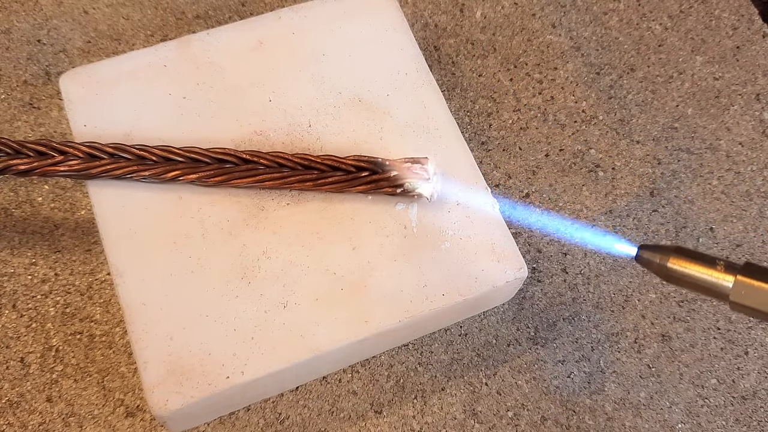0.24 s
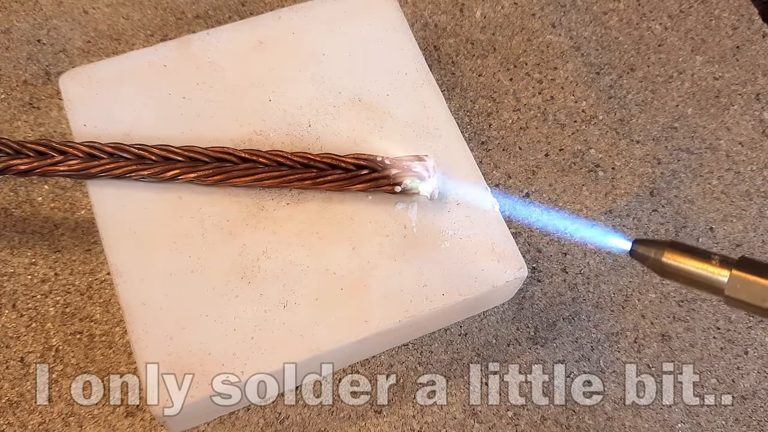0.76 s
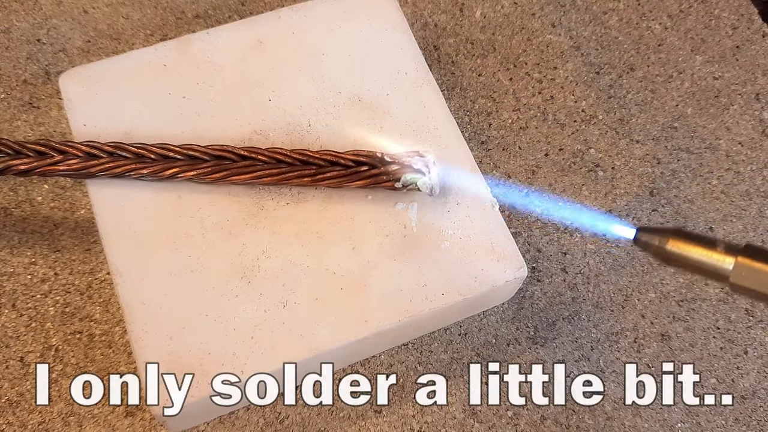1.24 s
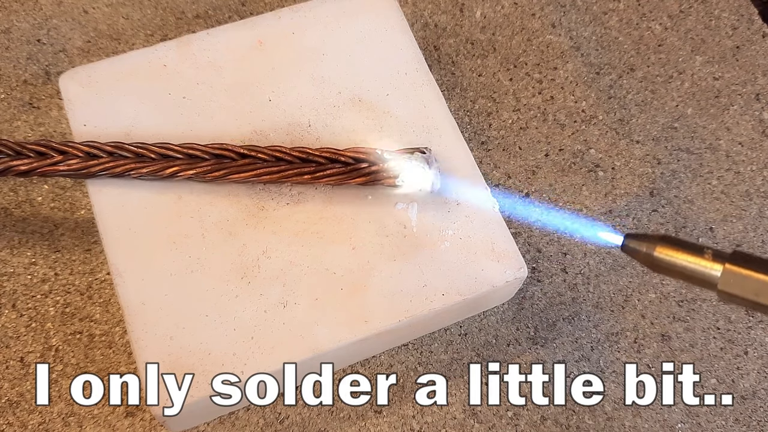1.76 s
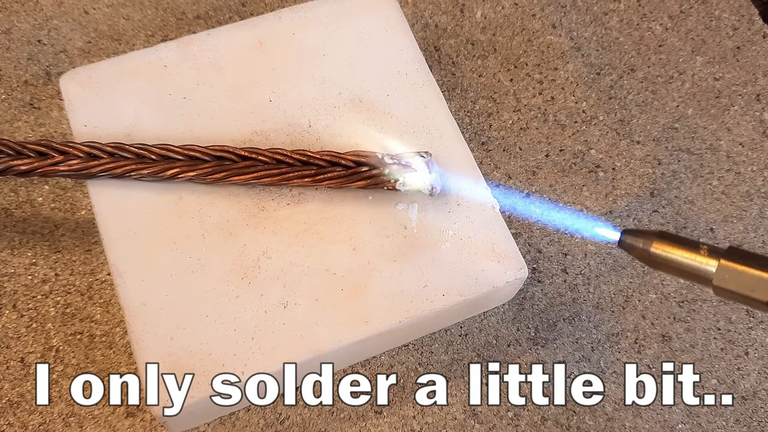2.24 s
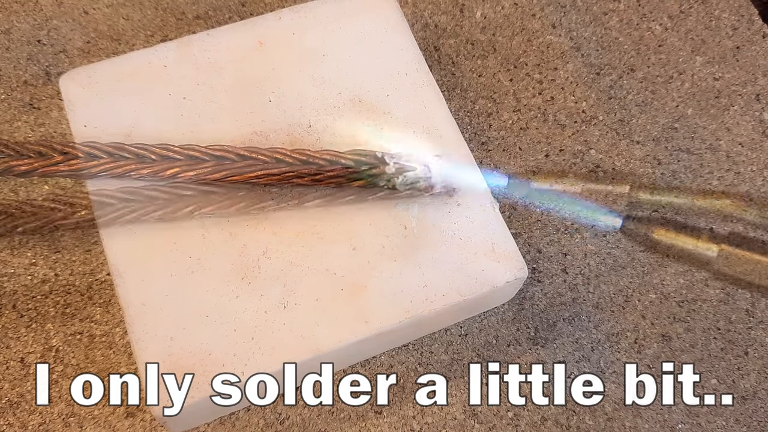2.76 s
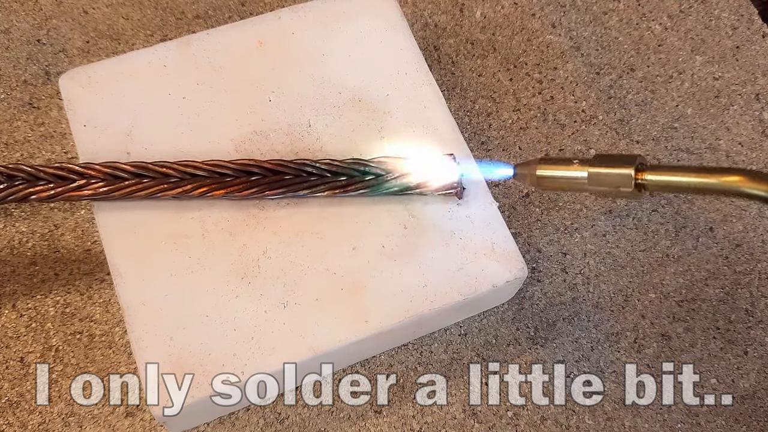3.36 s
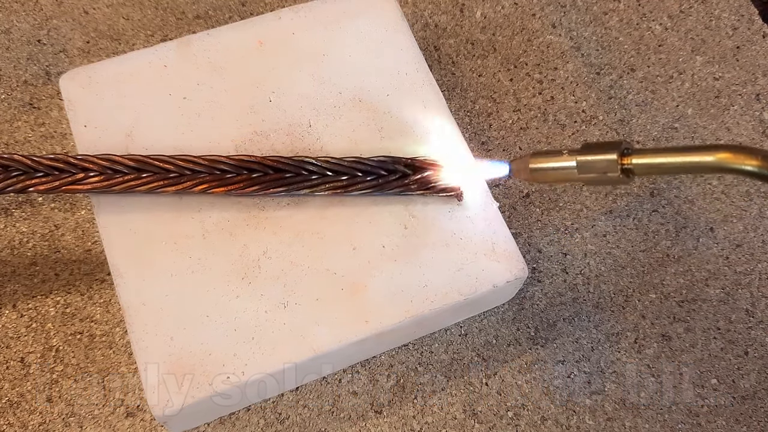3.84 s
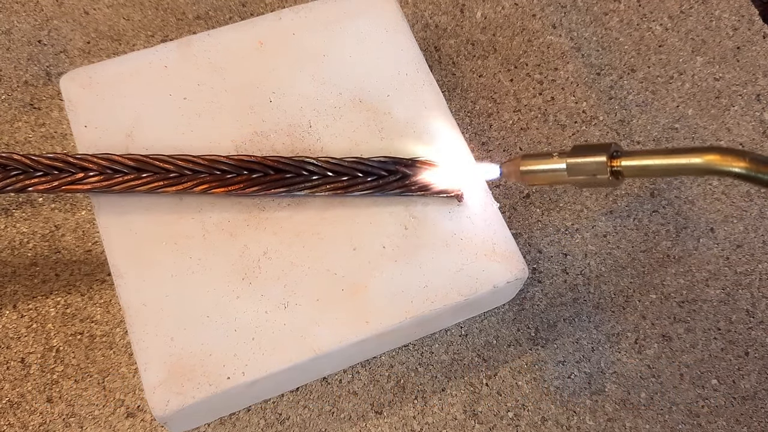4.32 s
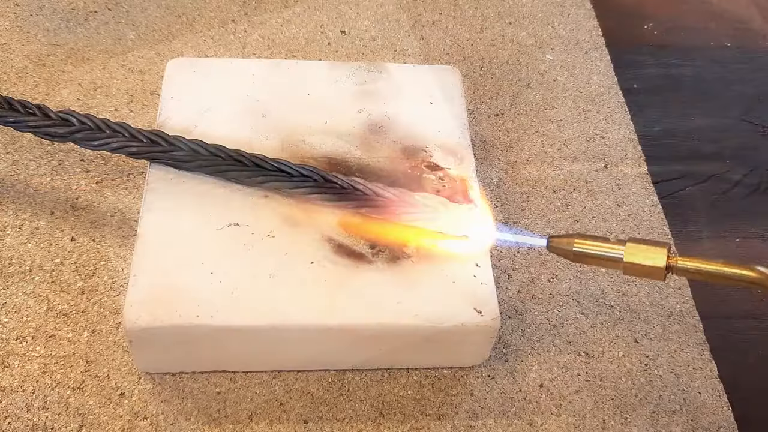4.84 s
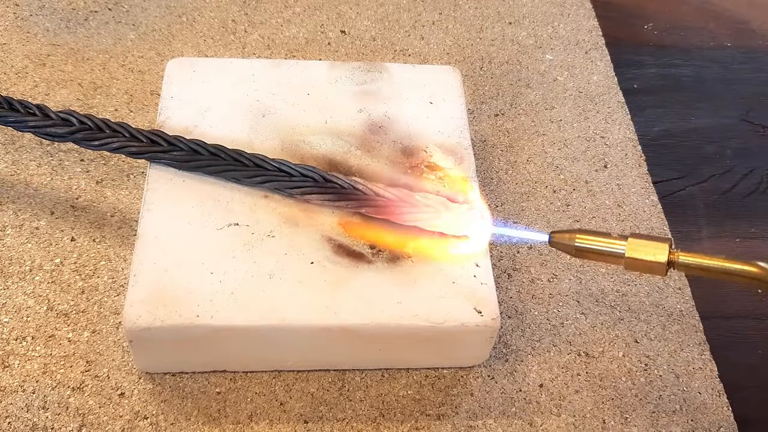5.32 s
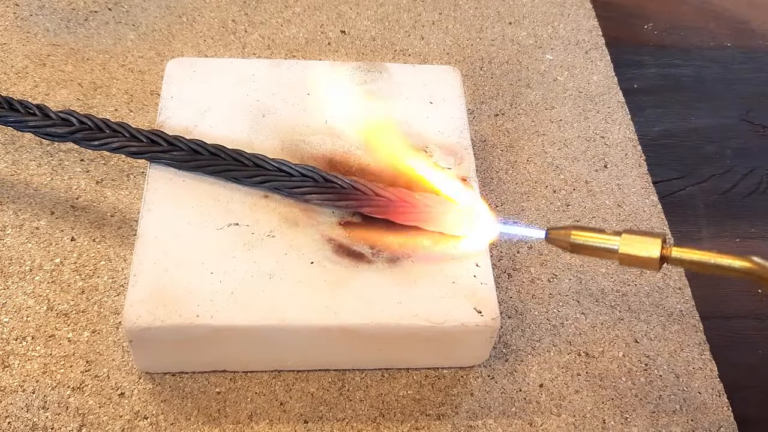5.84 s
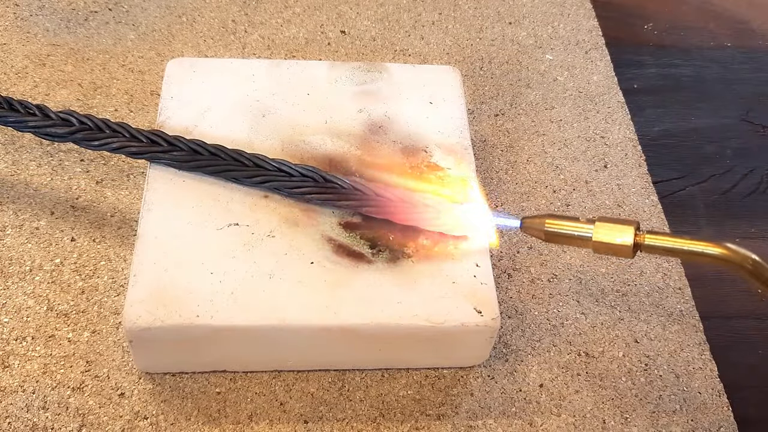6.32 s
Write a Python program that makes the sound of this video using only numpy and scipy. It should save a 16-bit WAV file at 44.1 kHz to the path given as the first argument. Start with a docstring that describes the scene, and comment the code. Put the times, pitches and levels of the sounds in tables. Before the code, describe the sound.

A small gas torch hisses sharply and steadily against copper wire in a quiet workshop, then softens to a fuller, fluttering, much quieter rush.

```python
"""In a quiet workshop, a small gas torch heats a braided copper wire on a firebrick before two microphones.
Three stretches crossfade: flame tip on the wire, nozzle close in, wire glowing with the flame spread.
The turbulent jet roars low, hisses and sizzles high: fluttering noise, coloured anew for each stretch.
Soft knocks on the stand are brief decaying low modes and a dull tick is one pulse.
Behind them lie a noise rumble and, in the last stretch, a hum of wavering sines."""
import sys
import numpy as np
from scipy import signal
from scipy.fft import rfft, irfft, next_fast_len
from scipy.io import wavfile
from scipy.ndimage import uniform_filter1d

SR = 44100
rng = np.random.default_rng(int(sys.argv[2]) if len(sys.argv) > 2 else 0)


def persist_wave(psi):
    """Save psi, clipped to +-1, as 16-bit WAV."""
    counts = np.round(np.clip(psi, -1, 1) * 32767).astype(np.int16)
    wavfile.write(sys.argv[1], SR, np.atleast_2d(counts).T)


N = 290619
T = np.arange(N) / SR
SIZE = next_fast_len(N, True)
HZ = np.maximum(np.arange(SIZE // 2 + 1) * SR / SIZE, 1)  # kept above 0 for the log axis
TOP_HZ = 15740  # upper limit of the sound


def turbulence(eddy_db=1.52, bass_db=4.0, treble_db=1.0):
    """Two noises whose bands flutter: quickly together with the eddies, and each alone, the bass most."""
    white = rfft(rng.standard_normal((2, N)), SIZE)
    together_db = eddy_db * walk(300)
    octave_edges = [above(hz, .08) for hz in 350 * 2. ** np.arange(6)]
    edges = [1.] + octave_edges + [0.]
    alone_db = np.linspace(bass_db, treble_db, len(edges) - 1)
    gas = 0
    for lower, upper, depth_db in zip(edges, edges[1:], alone_db):
        band = irfft(white * (lower - upper), SIZE)[:, :N]
        gas = gas + band * undb(together_db + depth_db * walk(10.8))
    return gas


def flame(gas, levels_db, colour, peaks, pair, roar_hz, sizzle_hz, top_hz):
    """The jet at both microphones; roar, hiss, sizzle and top edge each follow their level."""
    shared, other = rfft(gas, SIZE)

    # the right side is partly the left one delayed in phase, partly a noise of its own
    pair_hz, alike, behind = np.transpose(pair)
    alike = over_hz(pair_hz, alike)
    lag = np.exp(-1j * over_hz(pair_hz, behind))
    right = alike * lag * shared + np.sqrt(1 - alike ** 2) * other

    hz, left_db, right_db = np.transpose(colour)
    sides = np.array([undb(over_hz(hz, left_db)) * shared, undb(over_hz(hz, right_db)) * right])
    sides *= ridges(peaks) * surfaces() * above(138, 1.0) * (HZ < TOP_HZ)

    low = 1 - above(roar_hz, 0.55)
    high, top = above(sizzle_hz, 0.022), above(top_hz, 0.034)
    jet = 0
    for share, db in zip((low, 1 - low - high, high - top, top), levels_db):
        part = irfft(sides * share, SIZE)[:, :N]
        jet = jet + part * undb(db) / np.std(part.mean(axis=0))
    return jet


def band_levels(shift, band_db, follow):
    """Levels of roar, hiss, sizzle and top edge: all follow the shift of the torch, each by its share."""
    # the roar swells or sags as the flame splashes over the strands: (time [s], width [s], level [dB])
    flares = [(.11, 0.021, 4), (.39, 0.017, -5), (.78, 0.086, 3), (1.38, 0.033, 6.5), (1.64, 0.013, 6),
              (1.88, 0.024, 2.5), (2.3, 0.057, 3), (3.08, 0.16, 4), (3.55, 0.03, 5), (3.8, 0.061, 6.5),
              (4.38, 0.034, 6), (4.73, 0.041, 4), (4.85, 0.04, 1)]
    # the hiss drops briefly: (time [s], width [s], level [dB])
    hiss_dips = [(5.83, .03, -2.5), (6.11, 0.03, -2), (6.35, 0.046, -0.5)]
    # the hiss drops as the flame slips off the wire end and returns at once: (time [s], level [dB])
    hiss_gap = [(5.92, -0.5), (5.932, -4), (6.0, -4.5), (6.06, -5), (6.078, 0)]
    # the sizzle swells or dips briefly: (time [s], width [s], level [dB])
    sizzle_swells = [(3.5, 0.17, 3.5), (4.2, 0.0085, -9), (5.89, 0.09, 2.5)]
    flicker_db, flicker_per_s = 2.1, 13  # sizzle and top edge, each alone

    moved_db = np.interp(T, *np.transpose(shift))
    roar, hiss, sizzle, top = (db + share * moved_db for db, share in zip(band_db, (*follow, 1)))
    roar = roar + swells(flares)
    hiss = hiss + swells(hiss_dips) + np.interp(T, *np.transpose(hiss_gap))
    sizzle = sizzle + swells(sizzle_swells) + flicker_db * walk(flicker_per_s)
    top = top + flicker_db * walk(flicker_per_s)
    return roar, hiss, sizzle, top


def surfaces(echo_db=-9, t60=.2, common=.65, from_hz=3500):
    """Direct sound plus scatter off bench and walls, stronger in the treble, partly common to both sides."""
    t = T[:SR // 4]
    both, *each = rng.standard_normal((3, len(t))) * np.exp(-np.log(1000) * t / t60)
    scatter = common * both + (1 - common) * np.array(each)
    scatter /= np.linalg.norm(scatter, axis=1, keepdims=True)
    share = .5 + .4 * above(from_hz, 1.)
    return 1 + undb(echo_db) * share * rfft(scatter, SIZE)


def turned(jet, span, change):
    """As the torch turns, the jet slides from its colour before the turn to its colour after it."""
    spectrum = rfft(jet, SIZE)
    half = np.sqrt(ridges(change))  # half the change lies on each side of the mean colour
    before = irfft(spectrum / half, SIZE)[:, :N]
    after = irfft(spectrum * half, SIZE)[:, :N]
    return before + np.interp(T, span, (0, 1)) * (after - before)


def rushing(sound):
    """The middle band swells and ebbs as the flame plays over the wire."""
    # edges of the middle band: (low edge [Hz], high edge [Hz])
    rush_hz = (1310, 3480)
    # swells and ebbs of the middle band: (time [s], width [s], level [dB])
    rush_swells = [(.97, 0.054, 0), (2.92, .05, -1), (3.12, .06, 1), (3.32, 0.016, -2.5), (3.76, .07, 0),
                   (3.9, .05, -1), (4.13, .04, 1), (4.23, 0.044, -1), (4.926, .007, 5), (5.3, .1, 0.5),
                   (5.52, 0.018, 1), (5.62, 0.023, -1.5), (5.78, 0.036, 1.5), (6.02, 0.08, -3),
                   (6.24, .05, -2), (6.45, .06, 0)]
    # it holds back early in the last crossfade, then catches at once: (time [s], level [dB])
    rush_catch = [(4.64, 0), (4.74, -4), (4.8, -4), (4.813, 3), (4.85, 2.5), (4.9, 0)]

    middle = above(rush_hz[0], 0.34) - above(rush_hz[1], 0.14)
    band = irfft(rfft(sound, SIZE) * middle, SIZE)[:, :N]
    level_db = swells(rush_swells) + np.interp(T, *np.transpose(rush_catch))
    return sound + (undb(level_db) - 1) * band


def bump(at, level_db, pitch):
    """A knock rocks the low modes of the stand under a bell-shaped push, mostly on the right."""
    # modes of the stand, before pitch factor, knock level and pan: (frequency [Hz], peak level [dB])
    bump_modes = [(90, -57.5), (138, -52), (168, -59), (260, -66)]
    rise_s, fall_s, pan_db = .021, .014, -24  # pan is left against right
    briefer = 1.5  # modes above the second one shorter: power of their frequency ratio to it

    since = T - at
    scaled = since / np.where(since < 0, rise_s, fall_s)
    rock = 0
    for hz, db in bump_modes:
        push = np.exp(-(scaled * max(hz / bump_modes[1][0], 1) ** briefer) ** 2 / 2)
        rock = rock + undb(db + level_db) * push * np.cos(2 * np.pi * pitch * hz * since)
    return rock * undb(np.array([[pan_db], [-pan_db]]) / 2)


def tick():
    """One dull tick: a narrow bell-shaped pulse, the same on both sides."""
    at_s, width_s, peak_db = 3.6365, .0001, -46
    return -undb(peak_db) * np.exp(-((T - at_s) / width_s) ** 2 / 2)


def workshop():
    """Low noise rumble, unrelated on the two sides, its level wandering a little around rms 1."""
    # colour of the rumble, relative: (frequency [Hz], level [dB per Hz])
    rumble_colour = [(25, -28), (50, -14), (85, -5.5), (220, -8.5), (350, -17.5), (600, -12), (900, -19)]
    gain = undb(over_hz(*np.transpose(rumble_colour))) * (HZ < 1200)
    rumble = irfft(rfft(rng.standard_normal((2, N)), SIZE) * gain, SIZE)[:, :N]
    return rumble / np.std(rumble.mean(axis=0)) * undb(2.6 * walk(8))


def hum(waver_db=0.68):
    """Machine tones: steady sines whose levels waver."""
    # tones of the hum, before the waver: (frequency [Hz], level [dB rms])
    hum_tones = [(150.7, -86), (301.5, -87), (452.2, -81.5), (602.9, -79), (753.7, -84)]
    total = 0
    for hz, db in hum_tones:
        level = np.sqrt(2) * undb(db + waver_db * walk(17))
        total = total + level * np.sin(2 * np.pi * (hz * T + rng.random()))
    return total


def undb(db):
    """Gain of a level in dB."""
    return 10 ** (np.asarray(db) / 20)


def over_hz(hz, value):
    """A table column read at every frequency, straight on a log axis."""
    return np.interp(np.log(HZ), np.log(hz), value)


def above(hz, octaves):
    """Share that rises smoothly from 0 to 1 around hz."""
    return .5 + .5 * np.tanh(np.log2(HZ / hz) / octaves)


def ridges(table):
    """Gain of a few bell-shaped peaks and dips over frequency."""
    return undb(sum(db * np.exp(-((HZ - hz) / width) ** 2 / 2) for hz, width, db in table))


def walk(rate):
    """Random levels held 1 / rate s and slewed twice; spread near 1."""
    k = int(SR / rate)
    held = np.repeat(rng.standard_normal(N // k + 1), k)
    return 0.66 * uniform_filter1d(uniform_filter1d(held, k), k)[:N]


def swells(table):
    """Sum of brief bell-shaped level changes in dB."""
    coarse = T[::100]
    level_db = sum(db * np.exp(-((coarse - at) / width) ** 2 / 2) for at, width, db in table)
    return np.interp(T, coarse, level_db)


def scene():
    """Each stretch is flame plus workshop; linear crossfades join them under knocks, tick and hum."""
    # jet colours with the dips of the bounce off brick and bench:
    # (frequency [Hz], left level [dB], right level [dB])
    tip_colour = [(425, -30.5, -33.5), (845, -24, -27.5), (1220, -28, -29.5), (3410, -26, -29),
                  (5270, -11.5, -12), (5840, -10, -13), (6460, -18.5, -15.5), (7400, -14.5, -15.5),
                  (8760, -7.5, -2), (10950, 1, -3.5), (11480, -2.5, -30), (12260, -6, -4),
                  (13300, -9.5, -9.5), (16000, -10, -22)]
    close_colour = [(416, -32.5, -41.5), (805, -33, -40.5), (2060, -28, -27), (2010, -33, -34.5),
                    (2540, -23, -25), (3120, -21.5, -23.5), (3500, -23, -25.5), (4940, -11.5, -21),
                    (5670, -9.5, -13), (7260, -7, -9), (8660, -5, -3.5), (12400, -7, -14.5),
                    (13400, -14, -18), (16000, -6, -28)]
    spread_colour = [(407, -23.5, -37), (437, -22, -17.5), (686, -26.5, -35.5), (1080, -24.5, -26),
                     (2030, -5.5, -13), (3270, -7, -4), (3340, -11, -12.5), (4150, -2.5, -7),
                     (4970, -2.5, -11.5), (7740, 0.5, 0), (9300, 3.5, 1.5), (12200, -5.5, -9.5),
                     (13600, -23, -27), (15590, -4, -23)]
    # peaks and dips on top of each colour, per stretch: (frequency [Hz], width [Hz], level [dB])
    peaks = [
        [(235, 9, 5.5), (348, 31, -5), (464, 58, 4.5), (640, 160, -0.5), (900, 160, 1.5), (2080, 75, -3),
         (2690, 170, 3), (3260, 75, -1.5), (3260, 32, 4), (3680, 68, 2.5), (13200, 200, 1), (13800, 300, -11),
         (4470, 270, 3), (6230, 120, 1.5), (7400, 230, -2.5), (12400, 430, -2), (7700, 97, 3.5)],
        [(342, 40, -6), (905, 56, 2.5), (3100, 430, 3), (3710, 210, -2.5), (13300, 250, -7), (9200, 1700, -0.5),
         (11100, 350, 2), (12050, 120, -8), (12500, 260, -2.5)],
        [(600, 60, -6), (3800, 170, -2), (4200, 200, 1.5), (4950, 270, 0), (5850, 350, 1), (10700, 120, 5.5),
         (11000, 190, -5), (12050, 500, 4), (13100, 300, 7), (15900, 400, -12)],
    ]
    # likeness of the two sides, lowest where the bounce cancels the direct jet, per stretch:
    # (frequency [Hz], likeness [0-1], right side behind [rad])
    pairs = [
        [(300, .2, 0), (1000, .55, .1), (1800, .65, .3), (2600, .5, .5), (3100, .1, .4), (3600, .8, 0),
         (5300, .97, .2), (6200, .8, .7), (7100, .15, 1), (7900, .75, .7), (9500, .92, 1.1), (10700, .9, 2),
         (11500, .35, 3), (12300, .75, 5.5), (13100, .75, 6.28), (14000, .4, 6.28), (15500, .7, 6.28)],
        [(700, .05, 0), (1700, .65, .3), (3000, .55, 1.3), (3450, .3, 1.8), (3800, .25, .5), (4600, .55, 1),
         (5800, .87, 1), (7300, .87, 1.7), (8300, .95, 2.3), (9700, .9, 3), (10600, .7, 3.4), (11700, .2, 4.5),
         (12500, .7, 6.28), (15700, .65, 6.28)],
        [(300, .2, 0), (1100, .75, .4), (2100, .9, .2), (3000, .8, .3), (3500, .4, 1.2), (4200, .55, 2),
         (4800, .15, 2), (5500, .68, 1.2), (7000, .78, 1.3), (8500, .92, 2.2), (10000, .9, 2.7), (10900, .5, 3),
         (11500, .8, 6.28), (12400, .99, 6.28), (14000, .7, 6.28), (15700, .6, 6.28)],
    ]
    # borders of the jet bands, per stretch: (roar below [Hz], sizzle above [Hz], top edge above [Hz])
    borders = [(1400, 11600, 13600), (1400, 11900, 13600), (3600, 10250, 13500)]
    # band levels before shift, swells and turn, per stretch:
    # (roar [dB rms], hiss [dB rms], sizzle [dB rms], top edge [dB rms])
    band_db = [(-60.5, -29, -36, -35), (-69.5, -33, -35, -33), (-47.5, -46, -52, -56.5)]
    # top edge of the jet as the hand shifts the torch, per stretch: (time [s], level [dB])
    shifts = [
        [(0, 2.5), (.6, 1), (1.3, 0), (2.7, 1)],
        [(2.95, -3), (3.2, -3), (3.5, -6), (3.7, 3), (3.82, 5), (3.95, -1.5), (4.1, 5), (4.2, -1.5),
         (4.34, 3.5), (4.65, 2)],
        [(4.95, -2.5), (5.18, -5), (5.25, 0), (5.75, -1), (5.83, -0.5), (5.91, 1.5), (5.94, -4.5), (6.05, 0.5),
         (6.08, 4.5), (6.13, 10), (6.21, 5), (6.29, 11.5), (6.4, 13.5), (6.59, 6.5)],
    ]
    # how far the other bands follow the top edge, per stretch: (roar [dB/dB], hiss [dB/dB], sizzle [dB/dB])
    follow = [(-3, 0.09, 0.9), (0.35, 0.018, 0), (-0.11, 0.53, 1.14)]
    # the torch is turned once per stretch and the bounce dips slide: (start [s], end [s])
    turns = [(.4, 1.23), (3.55, 3.66), (6.08, 6.16)]
    # colour after the turn relative to before, per stretch: (frequency [Hz], width [Hz], level [dB])
    turn_colours = [
        [(3600, 740, 2), (6600, 340, -4.5), (7900, 490, 5), (10970, 600, -3.5), (12400, 510, 6.5),
         (13600, 290, 5), (15200, 250, -5)],
        [(4600, 990, -2.5), (9100, 830, 4.5), (10600, 610, -2.5), (12160, 120, -1), (14100, 450, -4.5)],
        [(220, 96, 9), (750, 250, 3.5), (1500, 350, -3), (4150, 350, 0), (5450, 850, 2.5), (10800, 220, 3),
         (13700, 300, -5)],
    ]
    # crossfades between the stretches: (start [s], end [s])
    crossfades = [(2.66, 3.126), (4.62, 4.94)]
    # workshop rumble before its swells, one per stretch: (level [dB rms])
    workshop_db = [-80, -80, -70]
    # the rumble rises or sinks now and then: (time [s], width [s], level [dB])
    rumble_swells = [(1.7, .3, 1.5), (6.45, .2, -0.5)]
    # soft knocks on the stand: (time [s], level [dB], pitch [factor])
    bumps = [(4.816, 0, 1), (5.005, -22, .65), (5.075, -19, .7)]

    fades = [np.clip((T - start) / (end - start), 0, 1) for start, end in crossfades]
    onward = [np.ones(N)] + fades + [np.zeros(N)]
    weights = [begun - ended for begun, ended in zip(onward, onward[1:])]

    colours = (tip_colour, close_colour, spread_colour)
    gas = turbulence()
    sound = 0
    for k, bands in enumerate(borders):
        # each stretch takes the turbulence from another point
        rolled = np.roll(gas, k * N // len(borders), axis=1)
        levels_db = band_levels(shifts[k], band_db[k], follow[k])
        jet = flame(rolled, levels_db, colours[k], peaks[k], pairs[k], *bands)
        jet = turned(jet, turns[k], turn_colours[k])
        rumble = undb(workshop_db[k] + swells(rumble_swells)) * workshop()
        sound = sound + weights[k] * (jet + rumble)
    knocks = sum(bump(*row) for row in bumps)
    return rushing(sound) + knocks + tick() + weights[2] * hum()


def record(dry):
    """A steep elliptic low-pass cuts the top of the treble."""
    return signal.sosfilt(signal.ellip(12, .2, 90, TOP_HZ, fs=SR, output="sos"), dry)


dry = scene()
out = record(dry)
persist_wave(out)
```